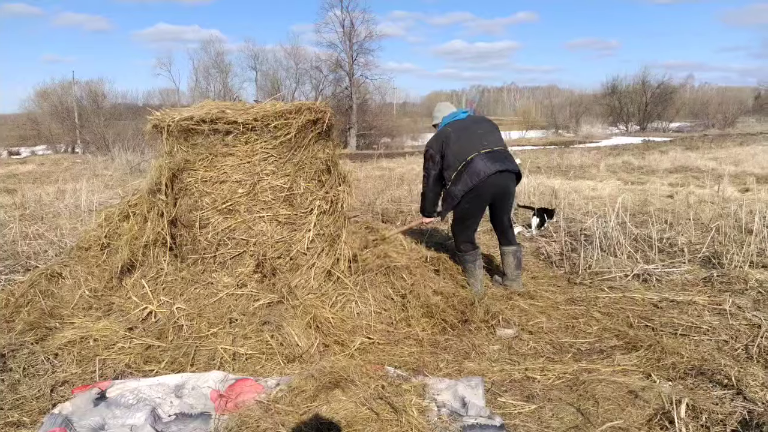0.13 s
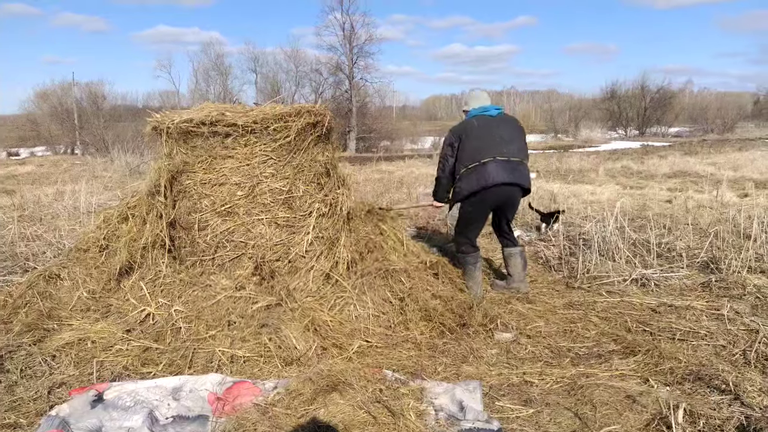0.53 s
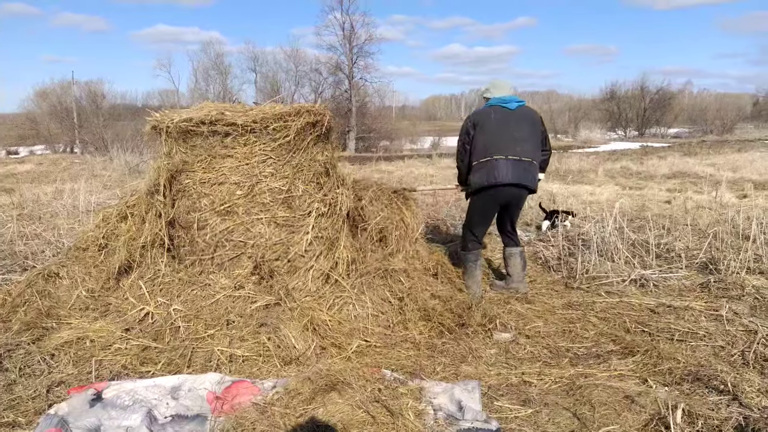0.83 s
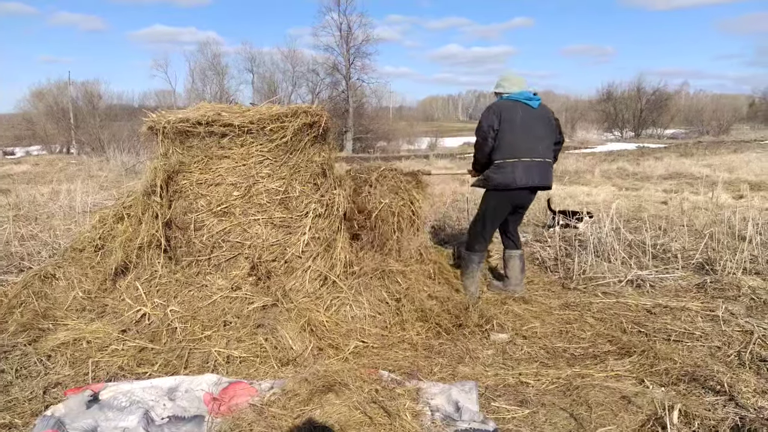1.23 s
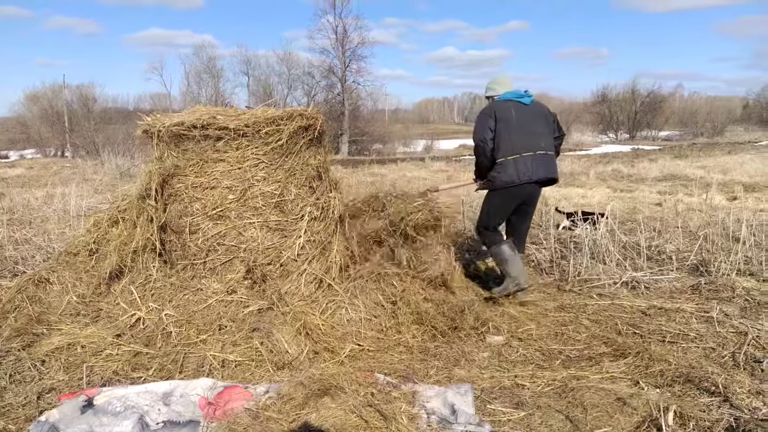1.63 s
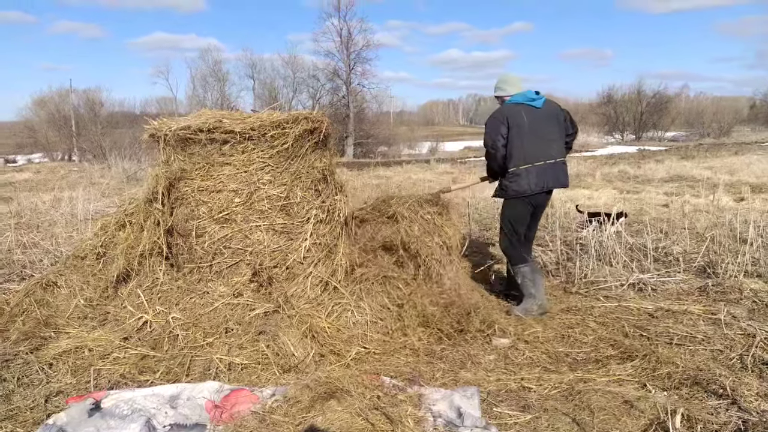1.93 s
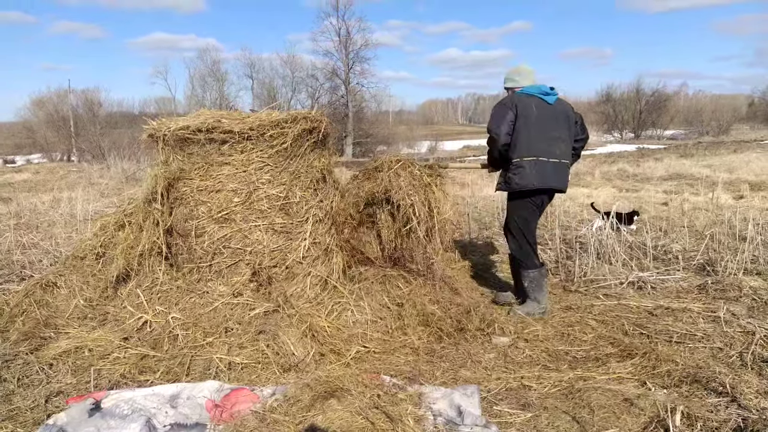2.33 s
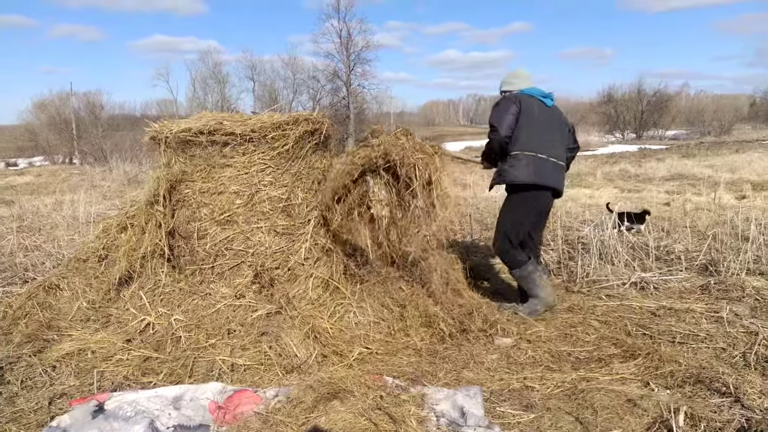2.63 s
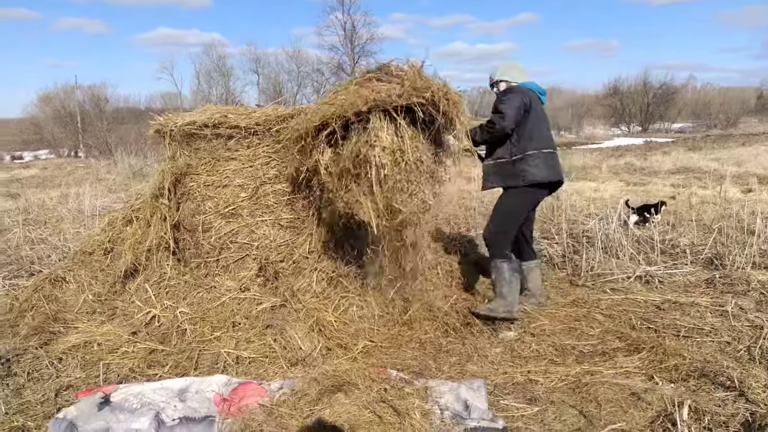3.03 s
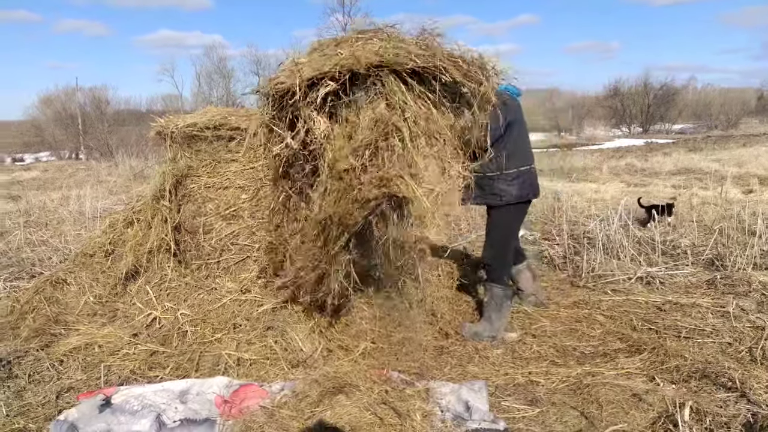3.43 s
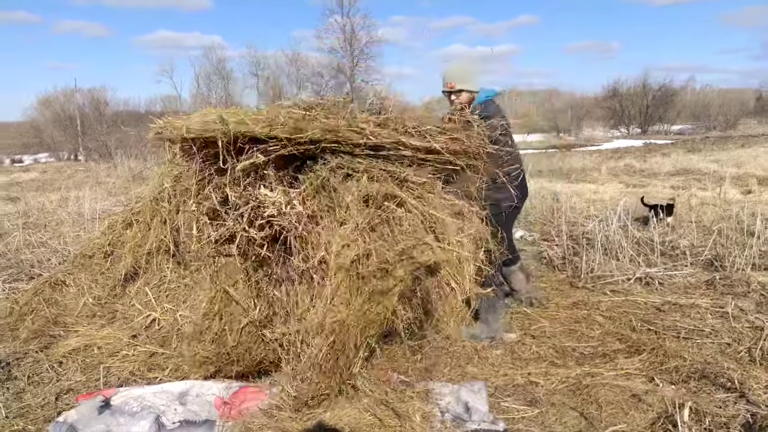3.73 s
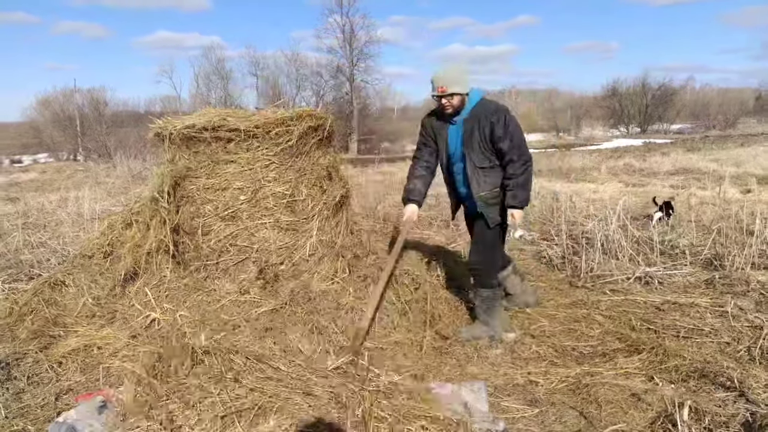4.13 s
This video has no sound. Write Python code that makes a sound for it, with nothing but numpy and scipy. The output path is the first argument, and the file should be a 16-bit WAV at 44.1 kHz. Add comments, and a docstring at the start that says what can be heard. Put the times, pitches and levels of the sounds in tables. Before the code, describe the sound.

In an open field, a forkful of dry hay is pulled from a stack with a soft, crackly rustle that swells around one and a half seconds. Short gusts thump and flutter on the stereo microphone, strongest near three and a half seconds. A stalk snaps as the load swings round, then the hay lands close by in a loud, bright swish. No echo.

```python
"""A forkful of dry hay is dragged from a stack, swung round and dropped close by in an open field.
The rustle is filtered noise and countless random snaps; bursts of the same crackle make stalks crunch.
A thick stalk cracks, a click with a noisy tail, and bands of crackle make dull, low swells in the rustle.
Short gusts buffet the two microphone ports: trains of eddy pulses, with single low pops in one port only.
A faint steady wash of noise is the open country."""
import sys
import numpy as np
from scipy import signal
from scipy.fft import rfft, irfft
from scipy.io import wavfile

SR = 44100
rng = np.random.default_rng(int(sys.argv[2]) if len(sys.argv) > 2 else 0)


def output_pcm(signal):
    """Save a mono or channel-first signal as 16-bit PCM at the path in sys.argv[1].

    Samples are clipped to [-1, 1] before scaling.
    """
    pcm = np.clip(np.atleast_2d(signal).T, -1, 1) * 32767
    wavfile.write(sys.argv[1], SR, np.round(pcm).astype(np.int16))


N = 188174
TIME, FREQ = np.arange(N) / SR, np.fft.rfftfreq(N, 1 / SR)  # s, Hz
HALF_EACH_WAY = np.array([[.5], [-.5]])  # splits a left-minus-right difference between the ports


def amp(db):
    """Decibel law: level to amplitude gain."""
    return 10 ** (np.asarray(db) / 20)


def unit(x):
    """Normalisation by mean power: rms 1."""
    return x / np.sqrt(np.mean(x ** 2) + 1e-20)


def curves(rows):
    """Linear interpolation in time of a table's columns."""
    s, *columns = np.transpose(rows)
    return np.array([np.interp(TIME, s, column) for column in columns])


def spectra(rows):
    """Linear interpolation in log frequency of a table's columns."""
    hz, *columns = np.transpose(rows)
    return np.array([np.interp(np.log(FREQ + 1), np.log(hz), column) for column in columns])


def colour(x, gain):
    """Linear filtering: each frequency is multiplied by its gain."""
    return irfft(rfft(x) * gain, N)


def below(hz, order):
    """Butterworth low-pass magnitude."""
    return 1 / np.sqrt(1 + (FREQ / hz) ** (2 * order))


def bell(centre_hz, octaves):
    """Gaussian resonance curve on an octave scale."""
    return np.exp(-.5 * (np.log2((FREQ + 1) / centre_hz) / octaves) ** 2)


def band_rms(x, low_hz, high_hz):
    """Band level: the deviation of the two ports' mean within a band."""
    return np.std(colour(x.mean(0), (FREQ > low_hz) & (FREQ < high_hz)))


def wander(hz):
    """Slow random fluctuation: low-passed noise of rms 1."""
    return unit(colour(rng.standard_normal(N), below(hz, order=2)))


# Likeness of diffuse sound in the two ports
# columns: frequency_hz, likeness (0-1)
LIKENESS = [(400, 0.13), (1400, 0.82), (2500, 0.9), (4000, 0.28), (15000, 0.06)]


def two_ports(pair):
    """Spatial coherence: sharing sound between the ports makes them as alike as the table says."""
    angle = np.arcsin(np.clip(spectra(LIKENESS)[0], 0, 1)) / 2
    return colour(pair, np.cos(angle)) + colour(pair[::-1], np.sin(angle))


def stalks(snaps_per_s, spread_db, snap_share, clump_db):
    """Stick-slip friction: unequal snaps over sliding hiss, in clumps as tangles let go."""
    sizes = amp(spread_db * np.minimum(rng.exponential(1, N), 5))
    signs = rng.choice([-1, 1], N)
    snaps = sizes * signs * (rng.random(N) < snaps_per_s / SR)
    # a snap reaches the second port a little early or late, by where its stalk lies
    shift = rng.integers(-12, 13, N)  # samples
    other = np.bincount((np.arange(N) + shift) % N, snaps, N)
    hiss = rng.standard_normal((2, N))
    # snap_share is a share of the power
    pair = np.sqrt(snap_share) * unit(np.array([snaps, other])) + np.sqrt(1 - snap_share) * hiss
    return pair * amp(clump_db * wander(27))


def straws(flicks_per_s, spread_db, decay_s, octaves=0.31, count=14):
    """Impulsive release: single straws flick free, each a scratch at its own pitch and place."""
    t = np.arange(2048) / SR
    hz_axis = np.fft.rfftfreq(len(t), 1 / SR) + 1
    out = np.zeros((2, N))
    for hz in np.linspace(1300, 11500, count):
        sizes = amp(spread_db * np.minimum(rng.exponential(1, N), 3))
        flicks = sizes * (rng.random(N) < flicks_per_s / count / SR)
        place = rng.uniform(0, np.pi / 2, N)
        placed = flicks * np.array([np.cos(place), np.sin(place)])
        tone = np.exp(-.5 * (np.log2(hz_axis / hz) / octaves) ** 2)
        grit = irfft(rfft(rng.standard_normal((2, len(t)))) * tone)
        # each pitch dies out at its own multiple of decay_s
        scratch = unit(grit * np.exp(-t / (decay_s * rng.uniform(0.37, 4))))
        out += signal.oaconvolve(placed, scratch, axes=1)[:, :N]
    return unit(out)


def grain(x, depth_db, swell_hz=70, count=12):
    """Independent band modulation: each band of the rustle swells at random, which gives a rough grain."""
    centres_hz = np.linspace(1000, 12000, count)
    bands = [np.interp(FREQ, centres_hz, row) for row in np.eye(count)]
    return sum(colour(x, band) * amp(depth_db * wander(swell_hz)) for band in bands)


# Level of the rustle through drag, lift and drop, with a short dip during the strongest gust;
# surges and offsets are added later
# columns: time_s, rustle_level_db
HAY = [(0.03, -62.5), (0.07, -67.5), (0.18, -58), (0.33, -57.5), (0.38, -53.5), (0.72, -52), (1.31, -46),
       (1.44, -45), (1.53, -49.5), (1.79, -49), (1.87, -53), (1.97, -53), (2.26, -48), (2.34, -47.5),
       (2.43, -49), (2.85, -48), (3.39, -52), (3.425, -54), (3.46, -52), (3.76, -54.5), (3.93, -46.5),
       (3.99, -39), (4.04, -38.5), (4.1, -38.5), (4.155, -37), (4.21, -41), (4.27, -40.5)]
# Where the load is
# columns: time_s, left_minus_right_db
PAN = [(0.0, -2.5), (2.0, -3), (3.6, -4.5), (4.26, -1)]


def heap(table, snaps_per_s, left_lag_s, rustle_db, body_db, straw_db, surge_db, grain_db,
         split_hz=3800, body_follow=0.86, usual_db=-50):
    """Two-band radiation: fine stalks rustle brightly, the bulk swishes dully, on one level curve."""
    level = curves(HAY)[0] + surge_db * wander(2.2)
    scratches = amp(straw_db) * straws(flicks_per_s=snaps_per_s / 10, spread_db=3.5, decay_s=0.0027)
    fine_stalks = stalks(snaps_per_s, spread_db=2.5, snap_share=0.16, clump_db=-0.93)
    coarse_stalks = stalks(snaps_per_s / 2, spread_db=2.0, snap_share=0.48, clump_db=0.5)
    fine = two_ports(fine_stalks + scratches)
    coarse = two_ports(coarse_stalks + scratches / 2)
    # sound from one side reaches the left port late
    delay = np.exp(-2j * np.pi * FREQ * np.array([[left_lag_s], [0]]))
    above_rumble = np.sqrt(1 - below(180, order=2) ** 2)
    tone = amp(spectra(table)) * above_rumble * delay
    low = below(split_hz, order=4)
    rustle = colour(grain(fine, grain_db), tone * np.sqrt(1 - low ** 2))
    body = colour(coarse, tone * low)
    rustle = rustle / band_rms(rustle, 5000, 12000)
    body = body / band_rms(body, 800, 3000)
    side = amp(HALF_EACH_WAY * curves(PAN)[0])
    # the body rises and falls less than the rustle
    body_level = usual_db + body_follow * (level - usual_db) + body_db
    return amp(level + rustle_db) * side * rustle + amp(body_level) * body


# Relative spectrum of hay at the stack, as each port hears it
# columns: frequency_hz, left_db, right_db
AT_STACK = [(507, -26, -21), (840, -22, -16), (1080, -26.5, -25), (2210, -15.5, -16), (2750, -18.5, -20),
            (3460, -24, -20), (4270, -37, -22), (5040, -16, -19), (6700, -15.5, -16.5), (8600, -23.5, -12),
            (9490, -8, -12), (10900, 1, -14), (11940, -1.5, -17.5), (12300, -22, -47), (14800, -19, -72),
            (16000, -26, -64)]
# Relative spectrum of hay landing close by, as each port hears it
# columns: frequency_hz, left_db, right_db
CLOSE_BY = [(400, -24.5, -22.5), (1120, -21.5, -20), (1690, -16, -17), (2650, -19.5, -18.5),
            (3000, -20, -12.5), (3400, -25, -12), (4420, -11, -10), (6400, 0.5, -2.5), (7300, -6, -1),
            (7900, -6, -1), (9160, 0, 3), (11550, 1.5, -4), (11940, 8.5, 8), (12200, -7.5, -47),
            (14700, -8, -72), (15900, -19, -53)]
# The swing toward the listener
# columns: time_s, nearness (0-1)
SWING = [(3.25, 0.13), (3.42, 0.07), (3.75, 0.43), (3.98, 0.75)]


def hay():
    """Equal-power crossfade: rustle passes from the stack to the near load, where more stalks move."""
    near = np.clip(curves(SWING)[0], 0, 1)
    dragged = heap(AT_STACK, snaps_per_s=5000, left_lag_s=0, rustle_db=0.5, body_db=-19.0,
                   straw_db=-12.5, surge_db=0.3, grain_db=0.7)
    landing = heap(CLOSE_BY, snaps_per_s=11000, left_lag_s=.00009, rustle_db=0.0, body_db=-15.5,
                   straw_db=-8, surge_db=0.5, grain_db=0.7)
    return np.sqrt(1 - near) * dragged + np.sqrt(near) * landing


# Relative spectrum of the still air over the field
# columns: frequency_hz, density_db
FIELD = [(20, 3), (60, 6.5), (150, -3), (400, -5), (900, -14), (2500, -18.5), (8000, -23.5), (15000, -44)]
FIELD_DB = -70  # rms level


def field():
    """Diffuse ambient noise: the faint steady wash of open country."""
    noise = two_ports(rng.standard_normal((2, N)))
    return amp(FIELD_DB) * unit(colour(noise, amp(spectra(FIELD))))


BREEZE_DB, BREEZE_SWAY_DB = -72.5, 2  # the air between gusts, before the lift in wind()
GUST_RISE_S, GUST_FALL_S = 0.011, 0.015  # time constants of amplitude
# Gusts on the microphone ports, before the lift in wind()
# columns: start_s, length_s, left_level_db, right_level_db
GUSTS = [(0.005, 0.13, -50, -48), (0.204, 0.17, -54.5, -53), (0.586, 0.16, -54.5, -49),
         (0.775, 0.096, -46.5, -38), (0.902, 0.07, -41.5, -44), (1.006, 0.031, -45, -40),
         (1.07, 0.04, -67, -61), (1.173, 0.032, -60, -58.5), (1.305, 0.083, -49, -43),
         (1.394, 0.15, -56, -49), (1.597, 0.089, -59, -46.5), (1.719, 0.058, -50, -47),
         (1.788, 0.15, -52.5, -54), (1.848, 0.024, -54, -46), (1.937, 0.097, -43, -42.5),
         (2.054, 0.088, -52, -44.5), (2.481, 0.11, -65, -46.5), (2.605, 0.055, -82, -58.5),
         (2.847, 0.037, -74, -55), (2.88, 0.113, -50.5, -49), (3.018, 0.08, -49, -48),
         (3.104, 0.072, -41.5, -41), (3.189, 0.088, -51, -48.5), (3.364, 0.054, -47.5, -46),
         (3.44, 0.12, -39.5, -34), (3.574, 0.075, -55, -53.5), (3.738, 0.017, -68, -56),
         (3.9, 0.43, -58.5, -56)]


def gusts():
    """Power addition: gusts swell out of the breeze, hold and trail off; level at each port in dB."""
    sway = np.array([wander(15), wander(6.6)])
    power = amp(BREEZE_DB + BREEZE_SWAY_DB * sway) ** 2
    for start, length, left_db, right_db in GUSTS:
        rise = np.minimum(TIME - start, 0) / GUST_RISE_S
        fall = np.maximum(TIME - start - length, 0) / GUST_FALL_S
        power = power + (amp([[left_db], [right_db]]) * np.exp(rise - fall)) ** 2
    return 10 * np.log10(power)


def eddy(t, hz, roundness=4.28, lean=0.41):
    """Vortex pressure: a push between two dips, the wake sucking harder than the front."""
    passage_s = (2 * roundness + 1) / (4 * np.pi * hz)
    t = t - lean / (2 * np.pi * hz)
    # lean is a phase in radians that makes the dips unequal
    return (np.exp(1j * lean) / (1 - 1j * t / passage_s) ** (roundness + 1)).real


def turbulence(pitch_hz, eddies_per_s, spread_db, count=7):
    """Superposed vortices: eddies of many sizes, pitched around pitch_hz, follow at uneven gaps."""
    t = np.arange(-2048, 2048) / SR
    pace = eddies_per_s * amp(5 * wander(40))
    # an eddy arrives each time the running count passes a whole number
    arrives = np.diff(np.floor(np.cumsum(pace) / SR), prepend=0)
    train = arrives * amp(spread_db * np.minimum(rng.exponential(1, N), 2))
    size = rng.integers(0, count, N)
    flutter = np.zeros(N)
    for k, hz in enumerate(pitch_hz * np.geomspace(.52, 1.35, count)):
        flutter += signal.oaconvolve(train * (size == k), eddy(t, hz, roundness=7.15), "same")
    return unit(flutter)


def steadied(x, hz):
    """Envelope division: evens out level changes slower than hz and leaves the flutter; rms 1."""
    power = colour(x ** 2, np.exp(-(FREQ / hz) ** 2))
    return unit(x / np.sqrt(abs(power) + power.mean() / 20))


# Single eddies that pop out of the flutter; levels are before the low-pass in wind()
# columns: time_s, peak_level_db, pitch_hz, port (0 left, 1 right)
EDDIES = [(0.017, -29, 146, 1), (0.031, -28, 158, 1), (0.106, -34, 167, 0), (0.1226, -34, 175, 1),
          (0.1675, -23.5, 154, 1), (0.222, -29.5, 152, 1), (0.2376, -34, 188, 0), (0.277, -26.5, 142, 1),
          (0.358, -37, 138, 1), (0.4646, -37, 85, 0), (0.638, -30.5, 121.3, 1), (0.651, -25.5, 126, 1),
          (0.7126, -27.5, 193, 0), (0.777, -25, 175, 1), (0.788, -26.5, 153, 1), (0.8121, -21, 159, 1),
          (0.8201, -20.5, 164, 1), (0.846, -27.5, 226, 0), (0.861, -24, 187, 0), (0.8801, -35, 171, 1),
          (0.9131, -39, 230, 0), (0.925, -32, 210, 0), (0.9612, -30, 228, 0), (0.943, -25, 266.6, 0),
          (0.9734, -16.5, 265, 0), (0.9793, -23.5, 185, 1), (1.021, -29, 153, 1), (1.032, -26.5, 141, 1),
          (1.3611, -29, 170, 1), (1.377, -28.5, 156.4, 1), (1.3884, -24.5, 170, 1), (1.4894, -21, 144, 1),
          (1.5733, -34.5, 158, 0), (1.62, -32, 132.1, 1), (1.656, -30, 135, 1), (1.681, -28, 129, 1),
          (1.7161, -33.5, 146, 1), (1.7321, -26, 132, 1), (1.771, -32, 126, 1), (1.8634, -32.5, 194, 0),
          (1.882, -31.5, 132, 1), (1.953, -31, 139, 1), (1.9757, -32.5, 180, 1), (2.001, -29, 149, 0),
          (2.0125, -31, 202, 0), (2.0537, -26, 199, 0), (2.0674, -34, 190, 0), (2.126, -25, 177, 0),
          (2.518, -32, 138, 1), (2.553, -32, 150, 1), (2.571, -24.5, 150, 1), (2.586, -32, 138, 1),
          (2.893, -31, 134, 0), (2.9875, -18.5, 207, 0), (3.0176, -25, 132, 1), (3.078, -30.5, 220, 1),
          (3.135, -23.5, 144, 1), (3.1473, -28.5, 166, 1), (3.1591, -19.5, 131, 0), (3.2662, -30, 156, 1),
          (3.2837, -35, 147, 1), (3.317, -37.5, 137, 1), (3.4363, -12, 223, 1), (3.4477, -16.5, 216, 1),
          (3.4645, -23, 292, 1), (3.468, -17, 284, 1), (3.4776, -28, 183, 0), (3.497, -28, 176, 0),
          (3.5084, -21.5, 197, 0), (3.5234, -21.5, 234, 1), (3.531, -27, 190, 1), (3.5453, -27, 212, 1),
          (3.553, -27, 199, 1), (3.643, -36, 131, 0), (3.671, -41, 146, 1), (3.745, -47, 150, 1),
          (3.956, -41, 144, 1), (4.052, -45, 145, 1), (4.0977, -38.5, 144, 0), (4.26, -34, 159, 0)]


def pops():
    """Near-field pressure: a vortex crossing one port is not heard in the other."""
    out = np.zeros((2, N))
    for s, db, hz, port in EDDIES:
        passing = abs(TIME - s) < 4 / hz
        out[int(port > .5), passing] += amp(db) * eddy(TIME[passing] - s, hz)
    return out


def wind(gust_db=2.5, calm_db=-60, brisk_db=-33, rumble_db=-14, rumble_lead=0.43):
    """Local turbulence at each port: faster air makes quicker, higher eddies; slow air mostly rumbles."""
    out = np.zeros((2, N))
    for port, level in enumerate(gusts()):
        speed = np.clip((level - calm_db) / (brisk_db - calm_db), 0, 1)
        slow = turbulence(pitch_hz=114.4, eddies_per_s=80, spread_db=2.5)
        fast = turbulence(pitch_hz=166.0, eddies_per_s=110, spread_db=7.0)
        flutter = steadied(np.sqrt(1 - speed) * slow + np.sqrt(speed) * fast, hz=6.8)
        rumble_band = below(78, order=3) * (1 - below(33, order=2))
        rumble = unit(colour(rng.standard_normal(N), rumble_band))
        # the rumble gains on the flutter as the air slackens
        rumble_gain = amp(rumble_db - rumble_lead * (level - brisk_db))
        out[port] = amp(level + gust_db) * (flutter + rumble_gain * rumble)
    return colour(out + pops(), below(1300, order=4))


# Thick stalks crunching; the onset, the decay and a fixed gain of root 2 act on the level
# columns: start_s, level_db, centre_hz, width_octaves, decay_s, left_minus_right_db
CRUNCHES = [(0.178, -60, 6500, 0.33, 0.0067, 0), (0.222, -66, 6000, 0.5, 0.004, -6),
            (0.553, -49, 9980, 0.3, 0.003, 5), (0.945, -54, 2400, 1.6, 0.005, -2),
            (2.012, -48, 11500, 0.07, 0.012, 14.5), (3.217, -63, 5530, 1.0, 0.005, -2),
            (3.322, -58.5, 2900, 0.6, 0.026, -1), (3.323, -53, 7500, 0.6, 0.04, 0),
            (3.3425, -51, 6800, 0.3, 0.007, -2), (3.945, -53.5, 7000, 0.67, 0.02, 0),
            (3.975, -48, 7000, 0.4, 0.026, 2)]


def crunches(rise_s=0.00046):
    """Brittle failure: a bunch of stalks gives way at once and the crackle decays exponentially."""
    crackle = two_ports(stalks(snaps_per_s=6000, spread_db=0.0, snap_share=0.8, clump_db=-0.5))
    out = np.zeros((2, N))
    for start, db, hz, octaves, decay_s, pan in CRUNCHES:
        age = np.maximum(TIME - start, 0)
        burst = unit(colour(crackle, bell(hz, octaves) * below(10700, order=16)))
        envelope = (1 - np.exp(-age / rise_s)) * np.exp(-age / decay_s)
        out += amp(db + pan * HALF_EACH_WAY) * burst * envelope * np.sqrt(2)
    return out


# Dull, low swells in the hay's rustle
# columns: peak_s, level_db, centre_hz, half_length_s
SWELLS = [(0.369, -75, 900, 0.03), (0.462, -76, 2130, 0.042), (1.768, -69, 874, 0.02),
          (2.153, -72, 950, 0.31), (2.55, -72.5, 910, 0.049), (2.752, -75.5, 950, 0.13),
          (3.354, -68, 960, 0.018), (4.09, -60.5, 1590, 0.076)]
SWELL_OCTAVES = 0.51  # width of the bell


def dull_swells():
    """Amplitude modulation of band-limited crackle: it swells and fades on a Gaussian curve."""
    crackle = two_ports(stalks(snaps_per_s=1500, spread_db=2.5, snap_share=0.58, clump_db=2.0))
    out = np.zeros((2, N))
    for peak, db, hz, half_s in SWELLS:
        swell = np.exp(-.5 * ((TIME - peak) / half_s) ** 2)
        out += amp(db) * unit(colour(crackle, bell(hz, SWELL_OCTAVES))) * swell
    return out


# One thick stalk breaks as the load swings round; levels are before the band-pass and pan in snap()
# columns: start_s, crack_peak_db, splinters_level_db, left_minus_right_db
SNAP = (3.3185, -30.5, -43.5, -4)


def snap(crack_s=0.00012, splinter_s=0.0022, lowest_hz=1120, splinter_hz=2400):
    """Sudden stress release: a dry crack, then a few milliseconds of duller splintering."""
    start, crack_db, splinter_db, pan = SNAP
    age, broken = np.maximum(TIME - start, 0), TIME >= start
    crack = -amp(crack_db) * np.exp(-age / crack_s)
    dull_noise = unit(colour(rng.standard_normal((2, N)), below(splinter_hz, order=3)))
    splinters = amp(splinter_db) * dull_noise * np.exp(-age / splinter_s)
    thin = (1 - below(lowest_hz, order=6) ** 2) * below(12000, order=16)
    return amp(pan * HALF_EACH_WAY) * colour(broken * (crack + two_ports(splinters)), thin)


def scene():
    """Superposition in the open air: the sources add, with no echo."""
    return hay() + field() + wind() + crunches() + dull_swells() + snap()


EDGE_HZ = 15700  # upper band limit


def record(dry):
    """Band limiting: a linear-phase low-pass at the upper edge."""
    low_pass = signal.firwin(511, EDGE_HZ, window=("kaiser", 9), fs=SR)
    return signal.oaconvolve(dry, low_pass[None], "same")


dry = scene()
out = record(dry)
output_pcm(out)
```